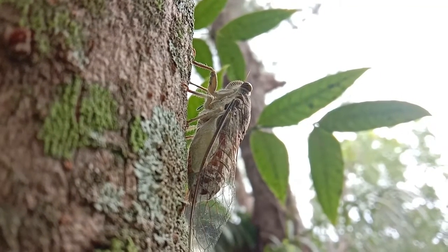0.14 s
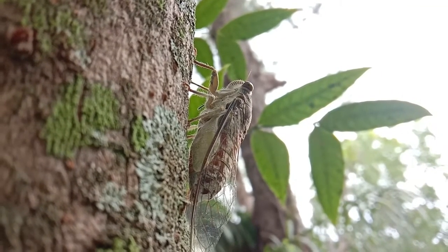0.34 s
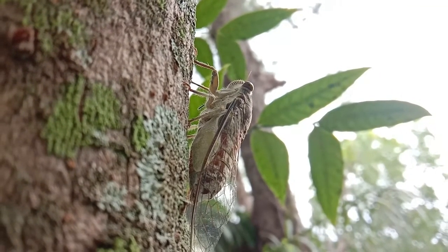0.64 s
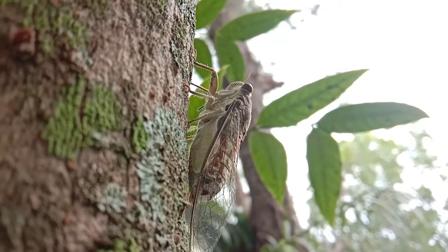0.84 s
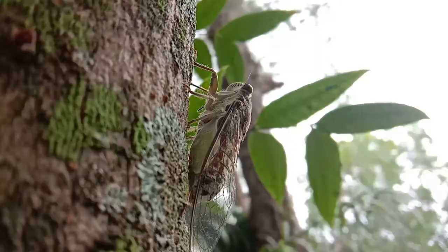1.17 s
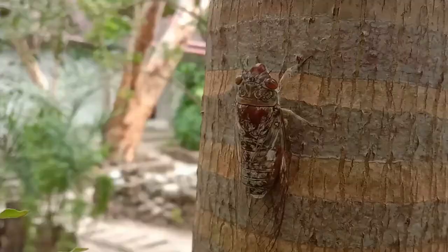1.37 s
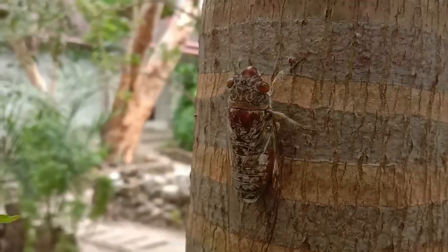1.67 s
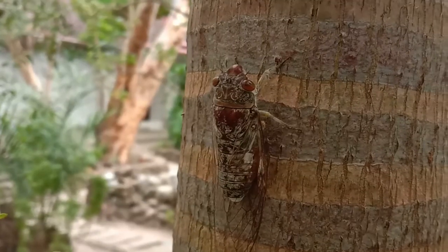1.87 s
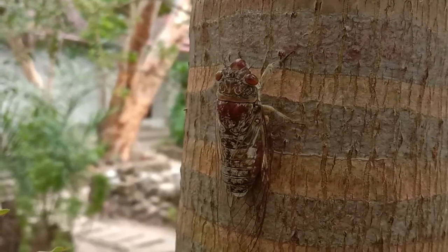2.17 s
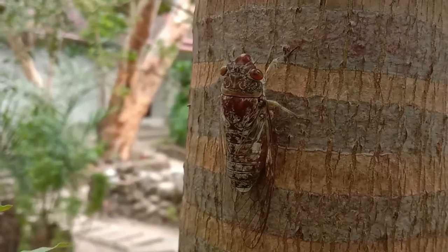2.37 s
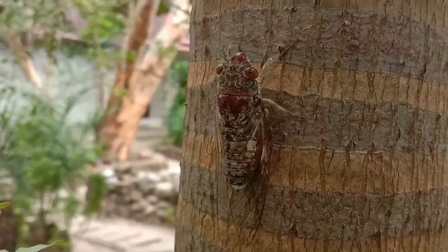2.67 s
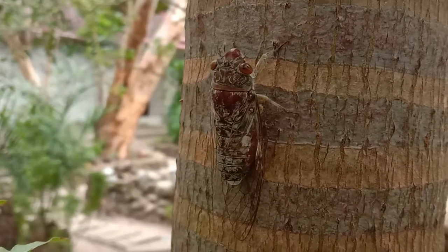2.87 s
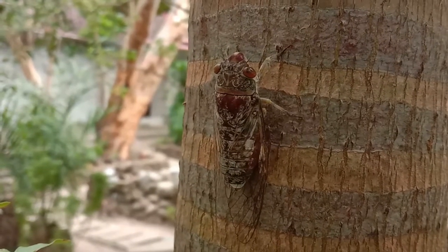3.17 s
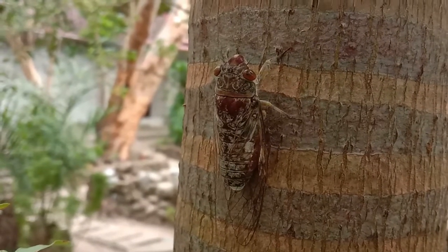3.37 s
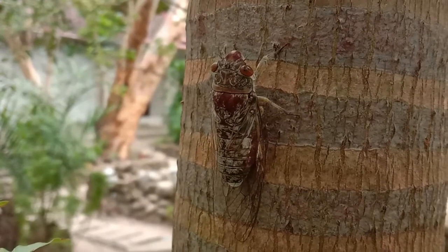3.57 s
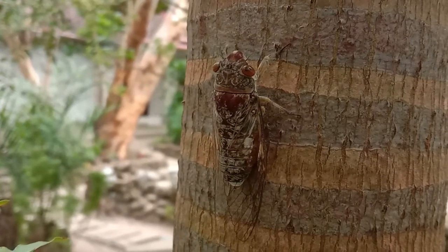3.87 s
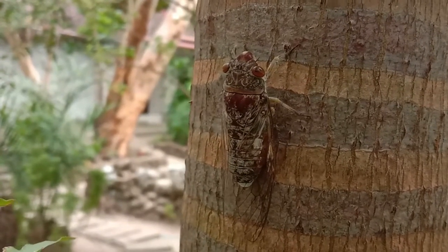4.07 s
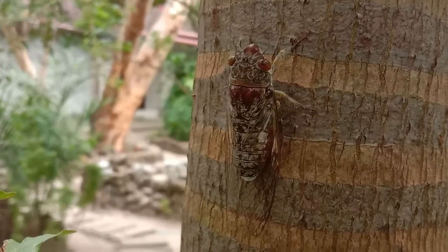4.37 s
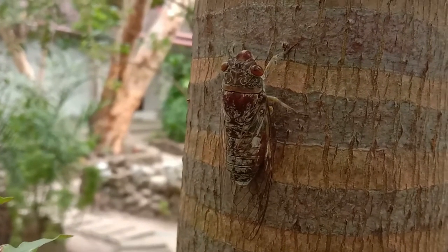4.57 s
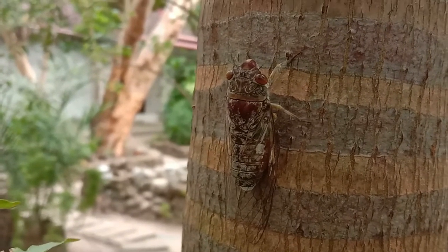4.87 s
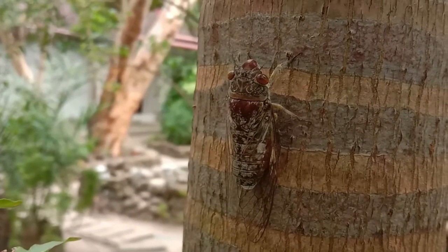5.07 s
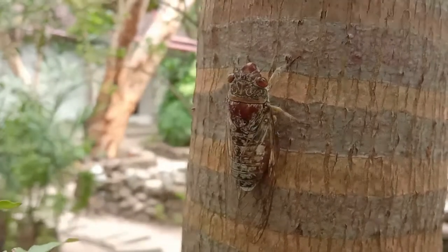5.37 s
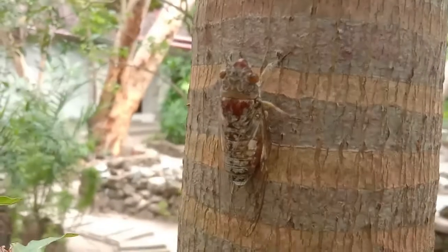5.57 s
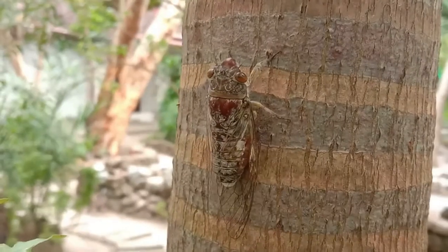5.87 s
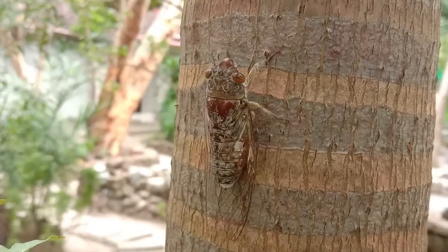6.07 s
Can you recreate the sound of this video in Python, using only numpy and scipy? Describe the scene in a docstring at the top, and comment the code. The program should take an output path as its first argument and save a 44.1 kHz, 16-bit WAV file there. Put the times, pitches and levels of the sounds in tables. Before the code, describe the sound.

Close to a tree trunk in a grove, cicadas make a dense, dry, high-pitched rasp with a fast throbbing hiss at the very top. After just over a second it cuts to silence, then swells quickly back at a second tree, slightly stronger and with almost no bass. Tiny blips thin the buzz for an instant. A far bird whistles twice, barely audible, over almost buried low rumble and thuds.

```python
"""Cicadas buzz in a grove, heard in mono at one tree and, after a short silence, at a second.
Their tymbals snap thousands of times a second into ringing bodies; scattering by the trees smears the snaps into a rasp.
A very high resonance throbs, and now and then the sound thins briefly to a few sine tones.
A far bird whistles twice, as a sine gliding in pitch, over soft thuds of ringing noise and a low rumble of coloured noise."""
import sys
import numpy as np
from scipy import signal
from scipy.fft import rfft, irfft, next_fast_len
from scipy.io import wavfile

SR = 44100
rng = np.random.default_rng(int(sys.argv[2]) if len(sys.argv) > 2 else 0)


def unload_wav(signal):
    """Save mono or channel-first audio to the path in sys.argv[1] as 16-bit WAV at rate SR, clipped to [-1, 1]."""
    wavfile.write(
        sys.argv[1],
        SR,
        np.round(np.clip(np.atleast_2d(signal).T, -1, 1) * 32767).astype(np.int16),
    )


N = 275184
TIME = np.arange(N) / SR   # s


# body resonances at the first tree: (frequency [Hz], width [Hz], relative level per Hz [dB])
FIRST_RESONANCES = [(499, 27, -34), (898, 116, -24.5), (1010, 150, -24), (1258, 94, -12), (1765, 416, -8),
                    (3480, 710, -1.5), (4280, 600, -7), (5156, 550, -1.5), (5720, 1100, -2.5),
                    (7130, 650, -6.5)]
# dry crack of the snaps, outside the resonances: (frequency [Hz], relative level per Hz [dB])
FIRST_SNAP_SPECTRUM = [(300, -67.5), (450, -46.5), (700, -33), (1300, -33.5), (2400, -21.5), (6500, -8),
                       (7900, -19), (9200, -26), (15500, -24.5)]


def first_tree(waver_db):
    """Superposition: the rasp of the bodies and the throbbing top band add at a steady, slightly wavering level."""
    rasp = chorus(FIRST_RESONANCES, FIRST_SNAP_SPECTRUM, tilt_db=-0.5, abdomen_db=-0.5, waver_db=1.1)
    top = top_throb(throb_s=.049, rate=5.2, unevenness=.03, depth_db=3.0, vary_db=1.5)
    return from_db(-20.0 + waver_db) * (rasp + from_db(-17.5) * top)


# effort at the second tree; a higher tilt means harder snaps, a higher gain a more freely ringing abdomen:
# (time [s], tilt [dB per octave], abdomen gain [dB])
SNAP_EFFORT = [(1.5, 0, 0.5), (2.4, -0.33, 1), (3.6, -0.55, 1.5), (4.1, -0.4, -2), (5.0, -0.05, -0.5),
               (6.2, 0.5, 0)]
# body resonances at the second tree: (frequency [Hz], width [Hz], relative level per Hz [dB])
SECOND_RESONANCES = [(1256, 66, -21.5), (1766, 347, -9), (3568, 698, 1), (4310, 860, -4.5), (5126, 534, 1),
                     (5504, 700, 0), (6080, 630, 1.5), (6933, 1090, -2.5)]
# dry crack of the snaps, outside the resonances: (frequency [Hz], relative level per Hz [dB])
SECOND_SNAP_SPECTRUM = [(900, -56), (1130, -40), (1350, -22), (2300, -55), (6000, -3.5), (7900, -18),
                        (8800, -20.5), (10200, -24), (15500, -26.5)]
SWELL_END_S, SWELL_DB_PER_S, GAIN_DB_PER_S, TOP_GAIN_DB_PER_S = 1.7, 50, .295, .3
BASS_EDGE_HZ = 1154


def second_tree(waver_db):
    """Varying excitation: effort tilts the rasp's spectrum while its level swells in, then slowly gains."""
    tilt_db, abdomen_db = in_time(SNAP_EFFORT)
    rasp = chorus(SECOND_RESONANCES, SECOND_SNAP_SPECTRUM, tilt_db, abdomen_db, waver_db=1.15)
    top = top_throb(throb_s=4.06, rate=6.1, unevenness=.17, depth_db=2.6, vary_db=1.0)
    since = TIME - SWELL_END_S
    top_db = -21 + TOP_GAIN_DB_PER_S * since   # relative to the rasp
    growth_db = np.minimum(SWELL_DB_PER_S * since, GAIN_DB_PER_S * since)
    cicadas = from_db(-17.5 + growth_db + waver_db) * (rasp + from_db(top_db) * top)
    # here the rasp holds almost no bass
    return signal.sosfilt(signal.butter(14, BASS_EDGE_HZ, "high", fs=SR, output="sos"), cicadas)


ABDOMEN_HZ, TILT_PIVOT_HZ = 3580, 4500


def chorus(resonances, snap_spectrum, tilt_db, abdomen_db, waver_db):
    """Source and filter: snaps ring each resonance separately; harder snaps favour the high ones."""
    crack = coloured(snaps(rate=1000, unevenness=.25, size_db=3.0, count=40), snap_spectrum)
    out = crack * from_db(tilt_db + waver_db * drift(16))
    for hz, width_hz, db in resonances:
        gain_db = db + tilt_db * np.log2(hz / TILT_PIVOT_HZ) + waver_db * drift(21.987)
        if abs(hz - ABDOMEN_HZ) < width_hz / 2:
            gain_db = gain_db + abdomen_db
        ringing = resonate(snaps(rate=480, unevenness=.3, size_db=2.0), hz, width_hz)
        out += from_db(gain_db) * ringing
    return grove(out, scatter_db=-11.5, t60=.15)


def snaps(rate, unevenness, size_db, count=24):
    """Impulsive excitation: many insects each buckle their tymbal ribs at an uneven pace of their own."""
    clicks = np.zeros(N)
    for pace in rate * rng.uniform(.7, 1.3, count):   # snaps per s
        gaps_s = np.exp(unevenness * rng.standard_normal(N // 20)) / pace
        at = (np.cumsum(gaps_s) * SR).astype(int)
        sizes = from_db(size_db * rng.standard_normal(len(at)))
        signs = rng.choice([-1, 1], len(at))
        inside = at < N
        clicks[at[inside]] += (sizes * signs)[inside]
    return rms_one(clicks)


def level_waver():
    """Amplitude modulation: a slight random wavering of the chorus, in dB."""
    return 0.27 * drift(14)


TOP_HZ, TOP_WIDTH_HZ = 15000, 1250   # the highest tymbal resonance


def top_throb(throb_s, rate, unevenness, depth_db, vary_db):
    """Amplitude modulation: the pumping abdomen swells the highest resonance five or six times a second."""
    # throb_s: time of one nominal crest [s]; rate: throbs per s; unevenness: in cycles
    cycles = (TIME - throb_s) * rate + unevenness * drift(rate)
    gain_db = depth_db * np.cos(2 * np.pi * cycles) + vary_db * drift(2 * rate)
    ringing = resonate(snaps(rate=700, unevenness=0.39, size_db=1.0), TOP_HZ, TOP_WIDTH_HZ)
    return from_db(gain_db) * rms_one(ringing)


# moments when the sound thins to tones: (time [s], half length [s], gain of the sound [dB], gain of the tones [dB])
THIN_MOMENTS = [(.614, .036, -55, 0), (.688, .008, -16, -3), (1.670, .009, -17, 0), (2.822, .007, -15, 3),
                (2.928, .008, -17, 3), (3.014, .008, -16, 3), (3.292, .009, -17, 3), (4.315, .009, -16, 3),
                (4.507, .008, -16, 3), (5.765, .008, -16, 3)]
# tones that stay: (frequency [Hz], relative level [dB])
STAYING_TONES = [(1744, -39), (3348, -30.5), (3612, -30.5), (3763, -36), (5006, -33), (5216, -34.5),
                 (5405, -32.5), (5588, -33.5), (5685, -34), (5798, -32.5), (6083, -33.5), (6266, -33.5),
                 (7181, -34), (15310, -41.5)]
TONE_GAIN_DB, TONE_STAGGER = 4.5, 0.78   # stagger in half lengths
THIN_EDGE_S = .008


def thinned(sound, waver, flicker_db):
    """Additive synthesis: for an instant the sound gives way to flickering sines that come and go one by one."""
    out = sound.copy()
    for s, half_s, sound_db, tone_db in THIN_MOMENTS:
        near = np.abs(TIME - s) < 3 * half_s
        t = TIME[near] - s
        share = np.clip((half_s - np.abs(t)) / THIN_EDGE_S + .5, 0, 1)
        out[near] *= 1 - share + share * from_db(sound_db)
        knot_times = np.linspace(t[0], t[-1], 10)
        for k, (hz, db) in enumerate(STAYING_TONES):
            flicker = np.interp(t, knot_times, rng.standard_normal(10))
            wobble = np.interp(t, knot_times, rng.standard_normal(10))
            late = TONE_STAGGER * (-1) ** k * rng.uniform(.5, 1)   # neighbours take turns
            swell = np.exp(-((t / half_s - late) / .9) ** 4)
            gain = from_db(db + TONE_GAIN_DB + tone_db + flicker_db * flicker)
            phase = 2 * np.pi * (hz * t + rng.random()) + waver * wobble   # waver in radians
            out[near] += gain * swell * np.sin(phase)
    return out


# a far bird's call, two accents on one note and then a downward slur:
# (first accent [s], time to the second accent [s], relative level [dB])
BIRD_CALLS = [(1.625, .165, -44), (3.955, .195, -43.5)]
WHISTLE_HZ, WHISTLE_SAG_HZ, WHISTLE_SAG_DB, ACCENT_S = 1276, 50, -6, 0.0344   # it sags between the accents
SLUR_DELAY_S, SLUR_S, SLUR_HZ, SLUR_DB = .2, 0.065, 216, -13   # the slur bottoms out after the second accent


def birds():
    """Frequency modulation: near-pure whistles, higher and louder on the accents, blurred by distance."""
    whistle = np.zeros(N)
    for s, gap_s, db in BIRD_CALLS:
        bottom_s = s + gap_s + SLUR_DELAY_S
        sag = 1 - hump(s, ACCENT_S) - hump(s + gap_s, ACCENT_S)
        slur = hump(bottom_s, SLUR_S)
        hz = WHISTLE_HZ - WHISTLE_SAG_HZ * sag - SLUR_HZ * slur
        unsteady_hz = hz * (1 + 0.0081 * drift(60))
        # full from the first accent to just past the bottom of the slur
        nearest_s = np.clip(TIME, s, bottom_s + SLUR_S / 2)
        sounding = hump(nearest_s, ACCENT_S)
        gain = sounding * from_db(db + WHISTLE_SAG_DB * sag + SLUR_DB * slur)
        whistle += gain * np.sin(2 * np.pi * np.cumsum(unsteady_hz) / SR)
    return np.std(whistle) * grove(whistle, scatter_db=1, t60=.3)


# soft low bumps: (time [s], resonance [Hz], level [dB])
SOFT_BUMPS = [(3.92, 115, -69), (3.92, 470, -66), (4.37, 120, -65), (4.46, 160, -75), (4.58, 135, -65.5),
              (6.02, 115, -66)]


def bumps(length_s):
    """Resonance: noise through a narrow low band, in brief swells, makes dull thuds."""
    out = np.zeros(N)
    for s, hz, db in SOFT_BUMPS:
        thud = rms_one(resonate(rng.standard_normal(N), hz, 90))
        out += from_db(db) * hump(s, length_s) * thud
    return out


# distant rumble: (frequency [Hz], relative level per Hz [dB])
RUMBLE_SPECTRUM = [(20, -0.5), (45, 3), (105, 7.5), (170, 3.5), (330, -0.5), (900, 1), (1500, -25)]


def distant_rumble():
    """Spectral shaping: white noise weighted towards the bass, at unit power."""
    return rms_one(coloured(rng.standard_normal(N), RUMBLE_SPECTRUM))


def grove(x, scatter_db, t60):
    """Multiple scattering: direct sound plus a dying cloud of reflections from trunks and leaves."""
    age = TIME[:SR]
    echoes = rng.standard_normal(len(age)) * from_db(-60 * age / t60)
    scattered = signal.fftconvolve(x, echoes / np.linalg.norm(echoes))[:N]
    return rms_one(x + from_db(scatter_db) * scattered)


def resonate(x, hz, width_hz):
    """Resonance: two like resonators in a row, with gain 1 at the peak."""
    b, a = signal.iirpeak(hz, hz / width_hz, fs=SR)
    return signal.lfilter(b, a, signal.lfilter(b, a, x))


def coloured(x, spectrum):
    """Linear filtering: weight the spectrum of x by a curve drawn on a log-frequency axis."""
    hz, db = np.transpose(spectrum)
    size = next_fast_len(N)
    bins_hz = np.maximum(np.fft.rfftfreq(size, 1 / SR), 1)
    gain = from_db(np.interp(np.log(bins_hz), np.log(hz), db))
    return irfft(rfft(x, size) * gain, size)[:N]


def drift(rate):
    """Random modulation: normal chance values, rate of them per second, joined by straight lines."""
    knots = rng.standard_normal(N // 10)
    return np.interp(TIME * rate, np.arange(len(knots)), knots)


def hump(s, width_s, time=TIME):
    """Gaussian envelope: a smooth rise and fall of height 1 around a moment."""
    return np.exp(-((time - s) / width_s) ** 2)


def in_time(rows):
    """Linear interpolation: one curve in time per column."""
    s, *columns = np.transpose(rows)
    return [np.interp(TIME, s, column) for column in columns]


def from_db(db):
    """Logarithmic level: decibels to amplitude gain."""
    return 10 ** (np.asarray(db) / 20)


def rms_one(x):
    """Normalisation: scale to unit mean power."""
    return x / np.sqrt(np.mean(x ** 2) + 1e-20)


FIRST_END_S, SECOND_START_S, FADE_IN_S = 1.1984, 1.437, 0.036


def scene():
    """Superposition in sequence: first tree, silence, second tree; the same in both ears."""
    waver_db = level_waver()
    first = first_tree(waver_db)
    second = second_tree(waver_db)
    # the first stretch drops suddenly, then dies away; the second fades in
    at_first = from_db(np.interp(TIME - FIRST_END_S, [0, .001, .02, .03], [0, -23, -33, -120]))
    at_second = np.clip((TIME - SECOND_START_S) / FADE_IN_S, 0, 1) ** 2
    rumble = distant_rumble()
    mix = at_first * (first + from_db(-68) * rumble)
    mix += at_second * (second + from_db(-71) * rumble + bumps(length_s=0.042) + birds())
    return np.tile(thinned(mix, waver=1.4, flicker_db=3.5), (2, 1))


def record(dry):
    """Band limiting: an elliptic low-pass cuts the top steeply."""
    return signal.sosfilt(signal.ellip(14, .1, 80, 15520, fs=SR, output="sos"), dry)   # cutoff in Hz


dry = scene()
out = record(dry)
unload_wav(out)
```